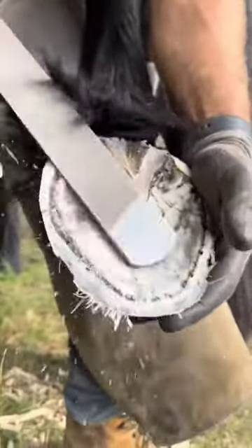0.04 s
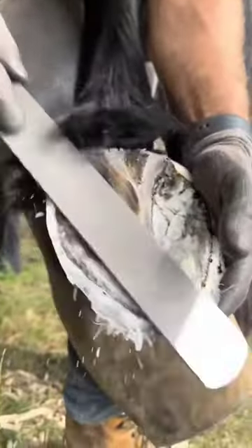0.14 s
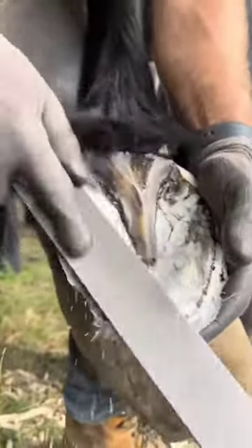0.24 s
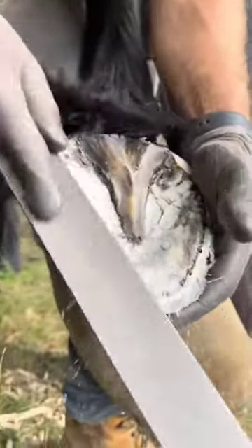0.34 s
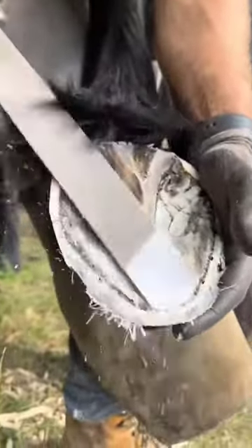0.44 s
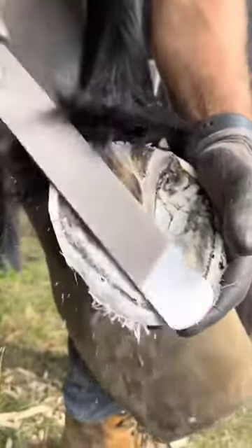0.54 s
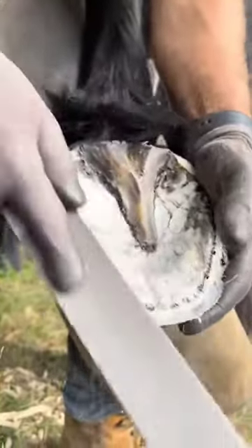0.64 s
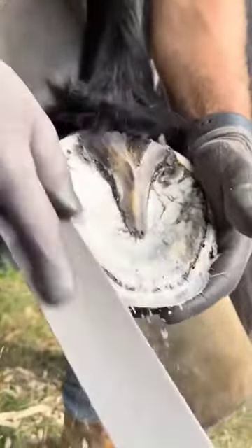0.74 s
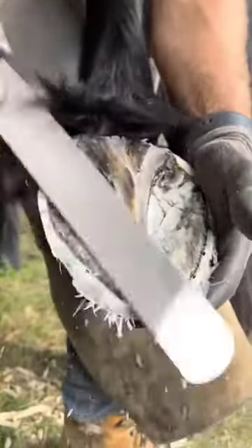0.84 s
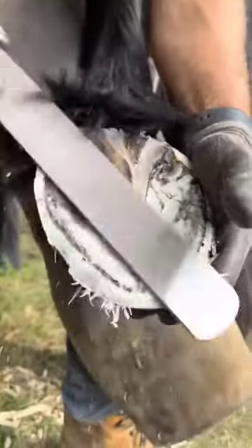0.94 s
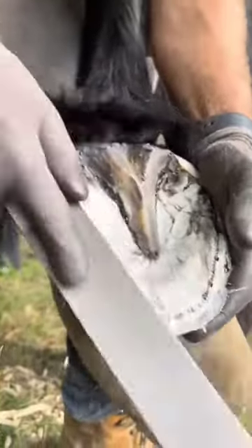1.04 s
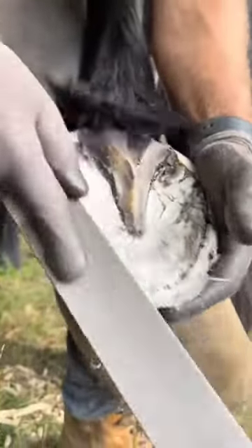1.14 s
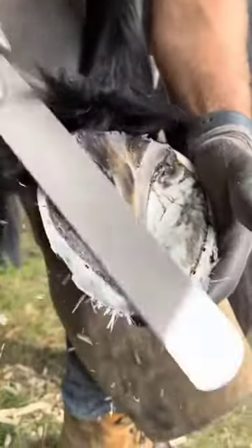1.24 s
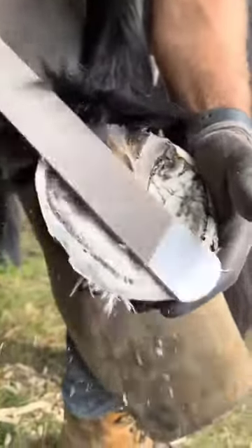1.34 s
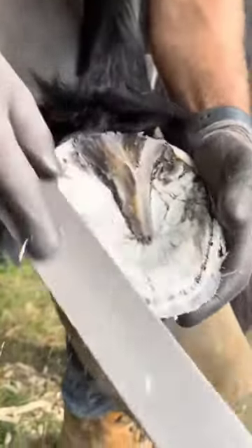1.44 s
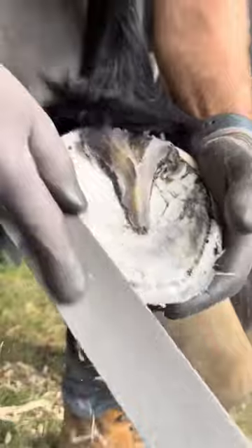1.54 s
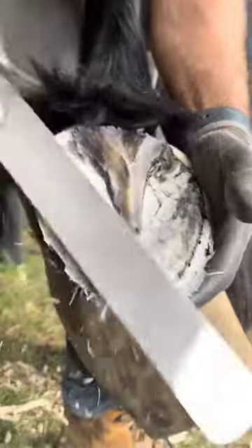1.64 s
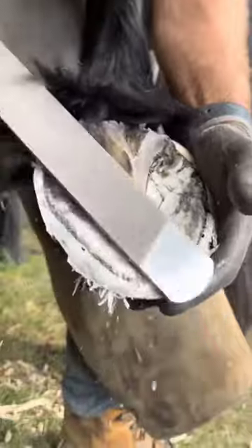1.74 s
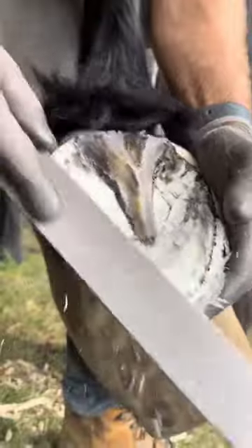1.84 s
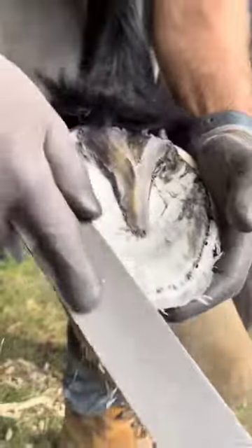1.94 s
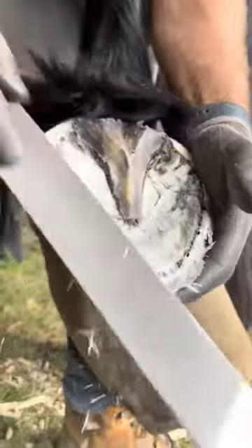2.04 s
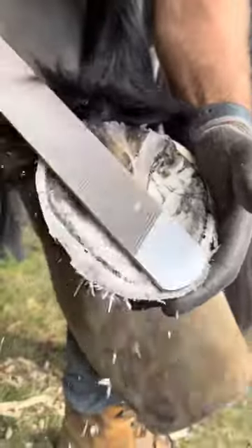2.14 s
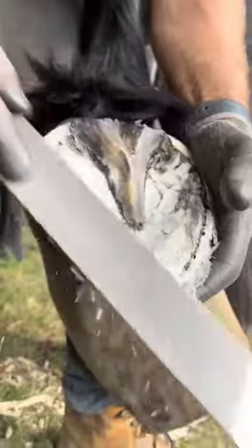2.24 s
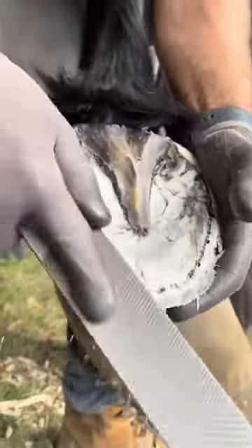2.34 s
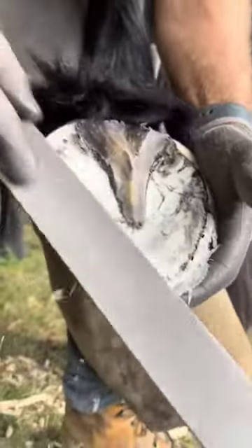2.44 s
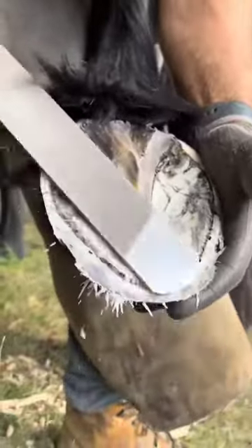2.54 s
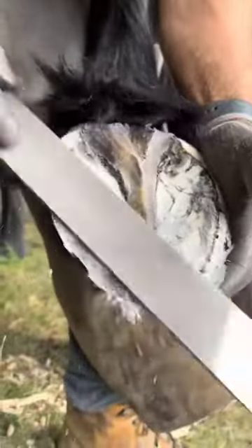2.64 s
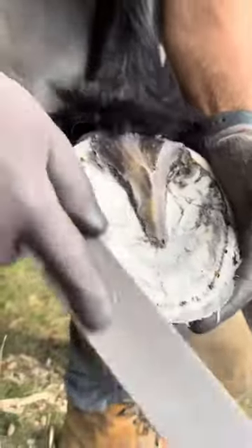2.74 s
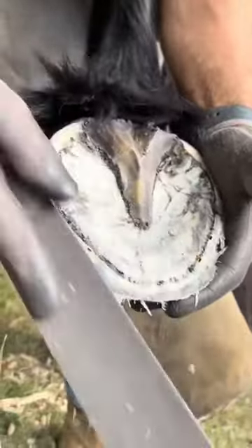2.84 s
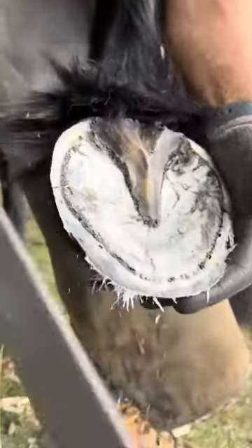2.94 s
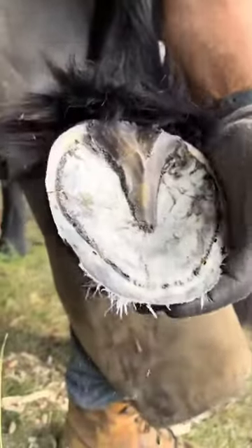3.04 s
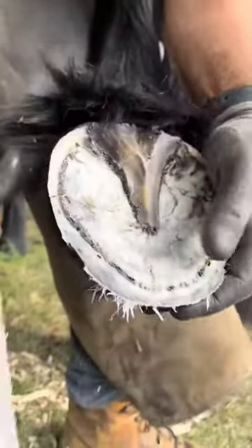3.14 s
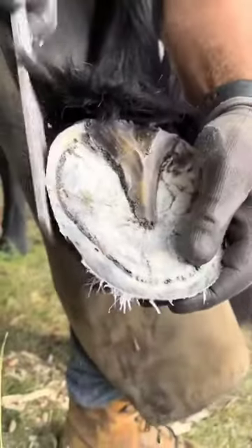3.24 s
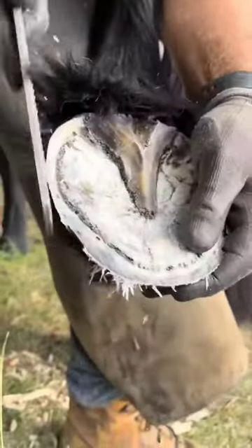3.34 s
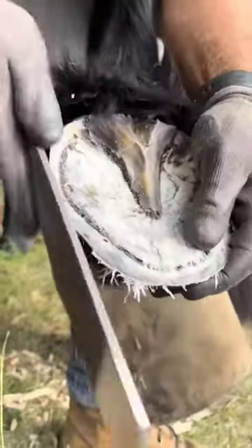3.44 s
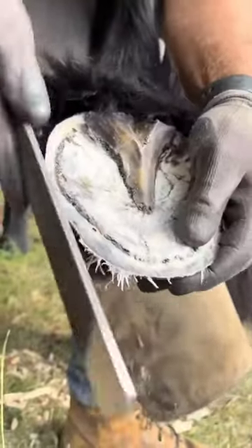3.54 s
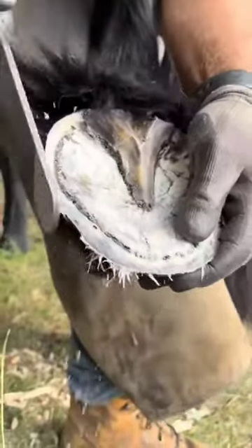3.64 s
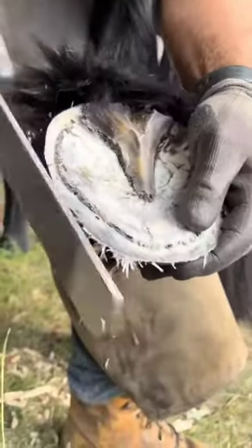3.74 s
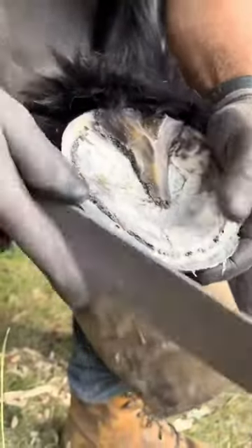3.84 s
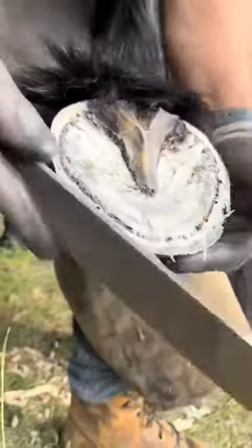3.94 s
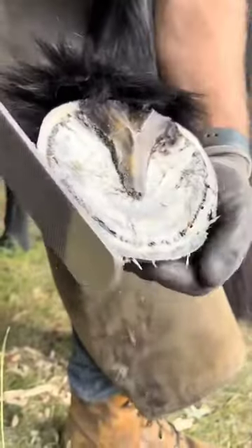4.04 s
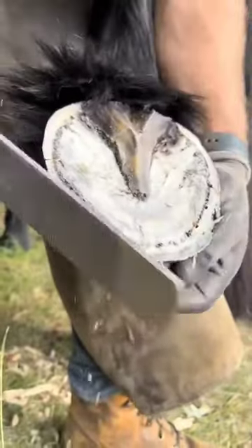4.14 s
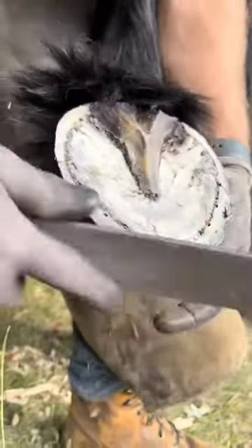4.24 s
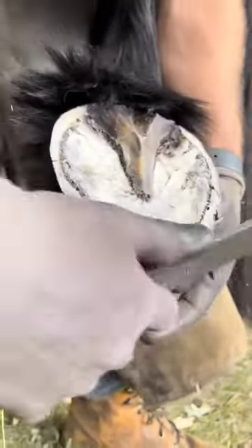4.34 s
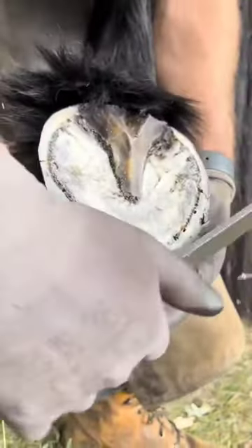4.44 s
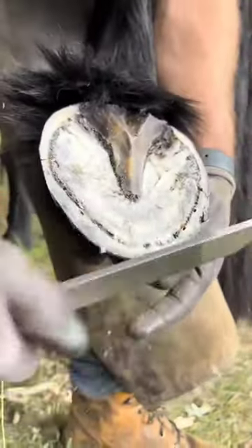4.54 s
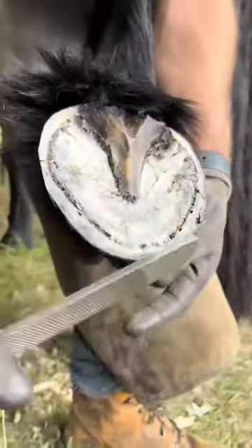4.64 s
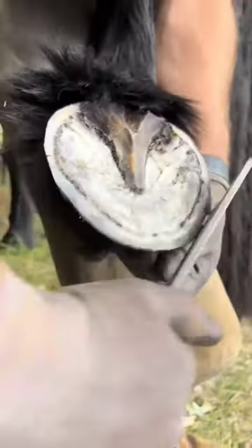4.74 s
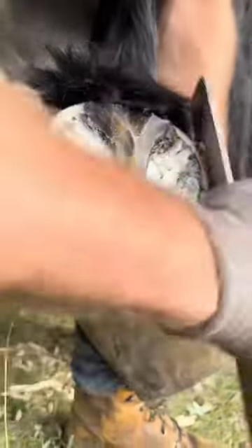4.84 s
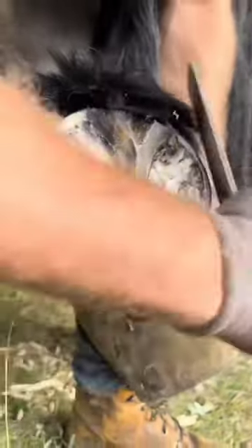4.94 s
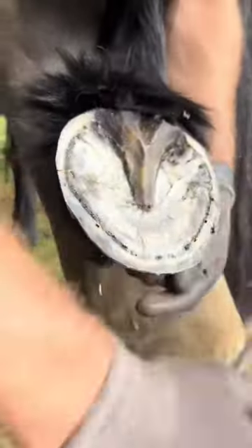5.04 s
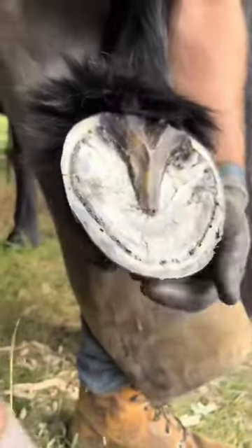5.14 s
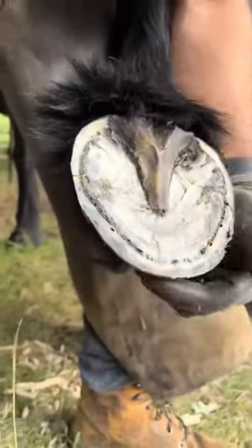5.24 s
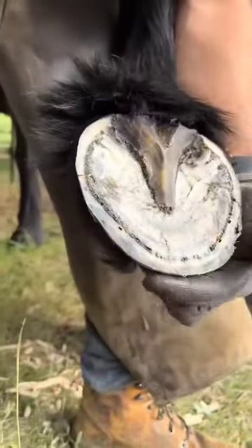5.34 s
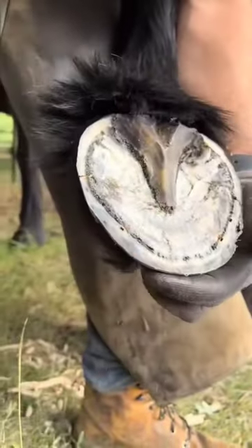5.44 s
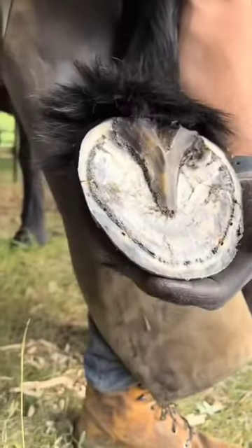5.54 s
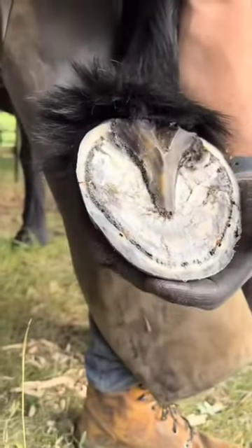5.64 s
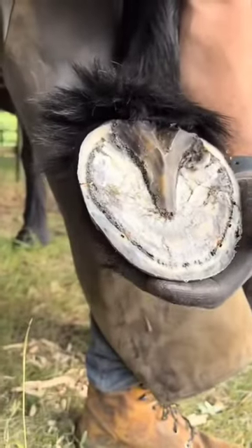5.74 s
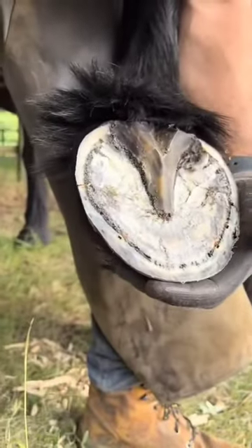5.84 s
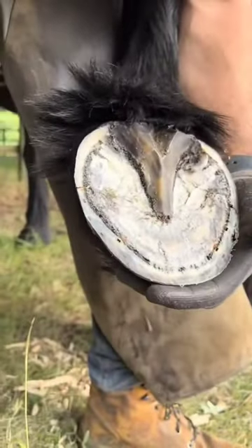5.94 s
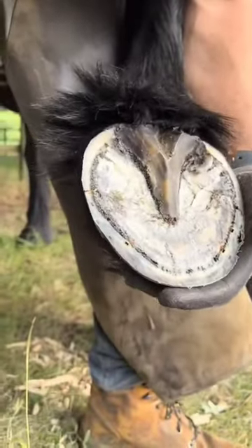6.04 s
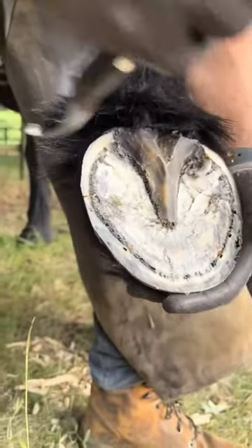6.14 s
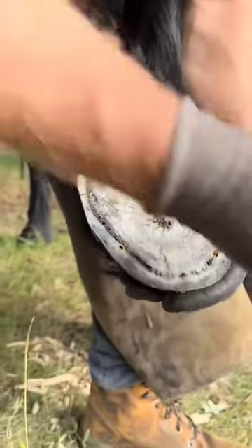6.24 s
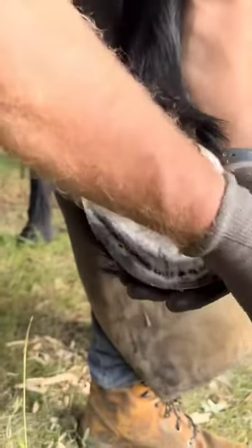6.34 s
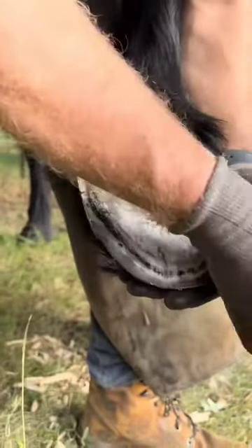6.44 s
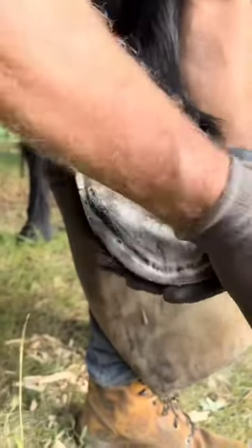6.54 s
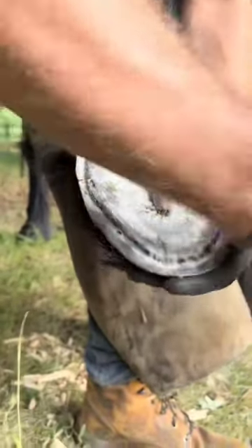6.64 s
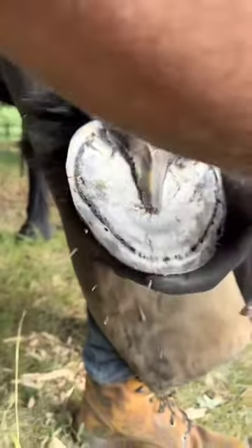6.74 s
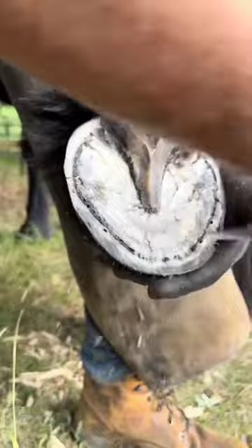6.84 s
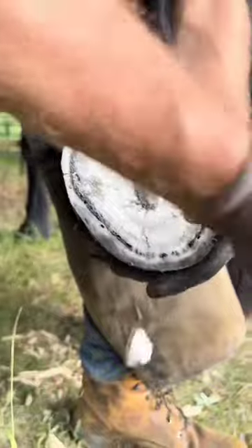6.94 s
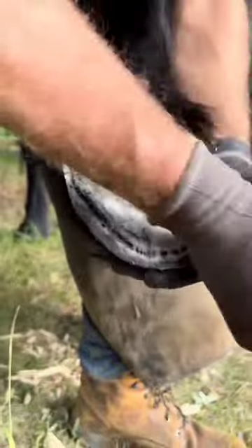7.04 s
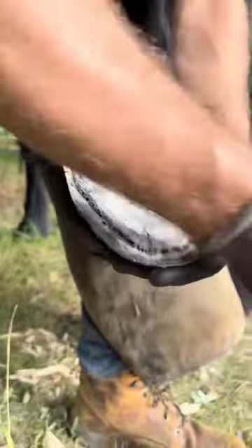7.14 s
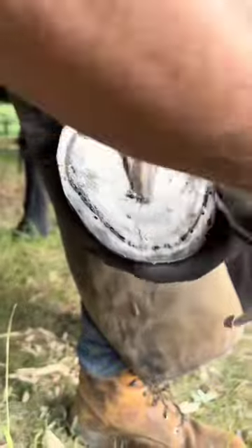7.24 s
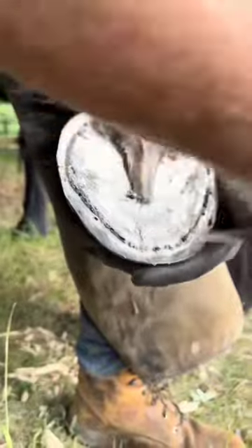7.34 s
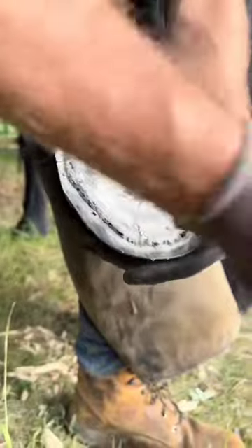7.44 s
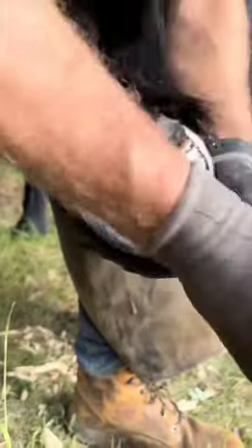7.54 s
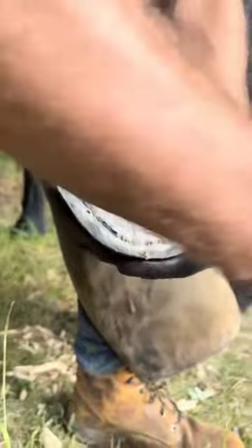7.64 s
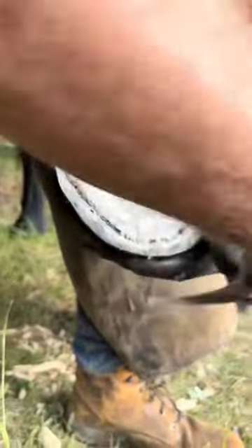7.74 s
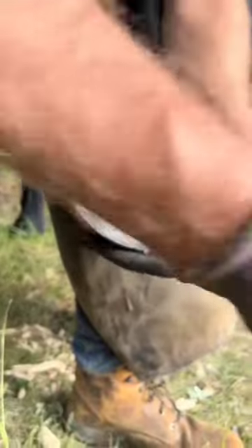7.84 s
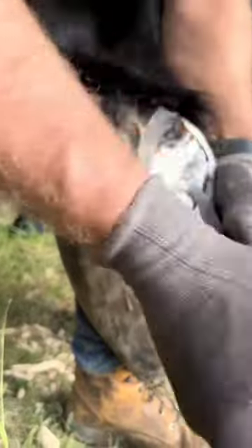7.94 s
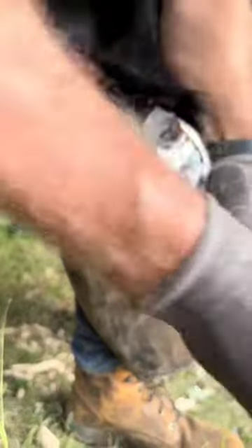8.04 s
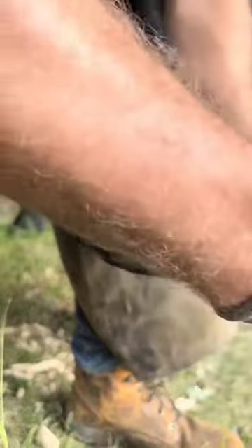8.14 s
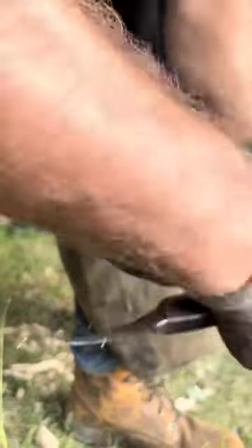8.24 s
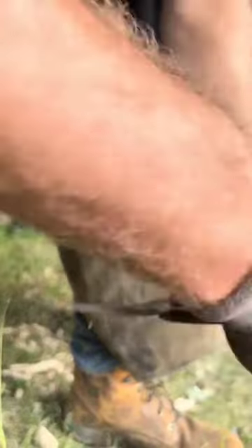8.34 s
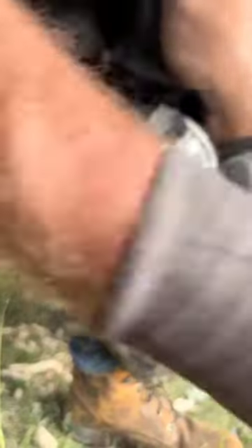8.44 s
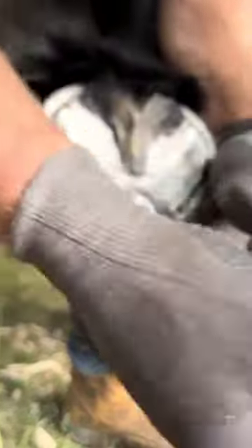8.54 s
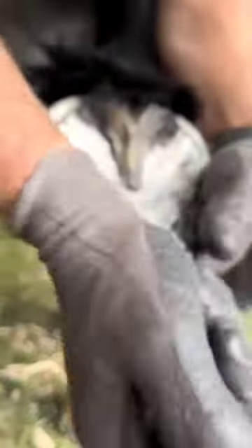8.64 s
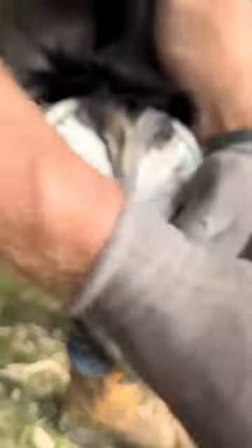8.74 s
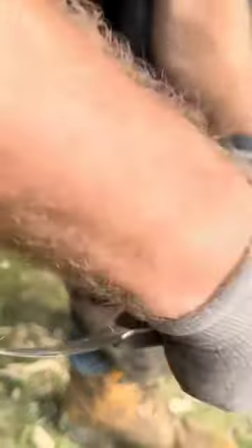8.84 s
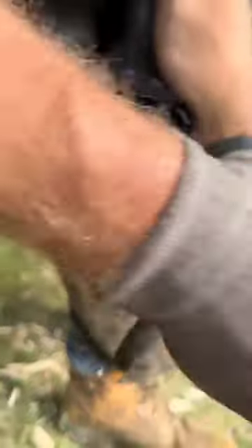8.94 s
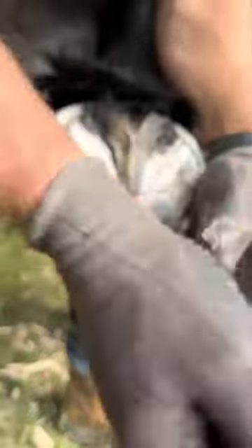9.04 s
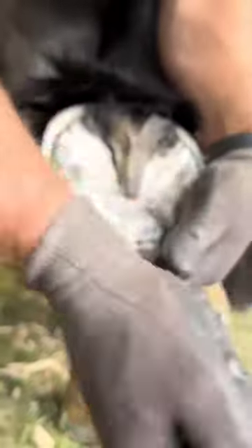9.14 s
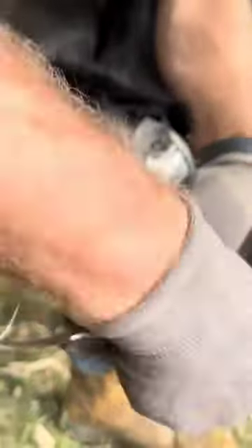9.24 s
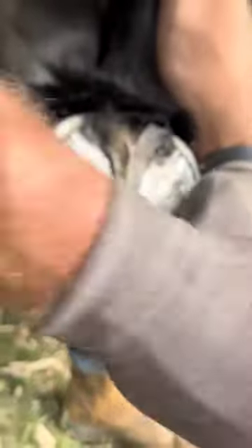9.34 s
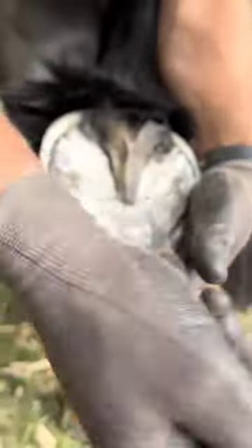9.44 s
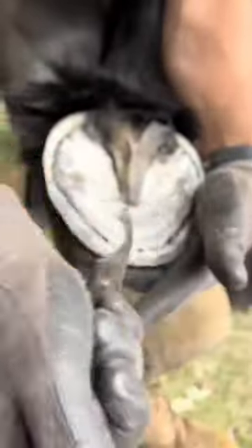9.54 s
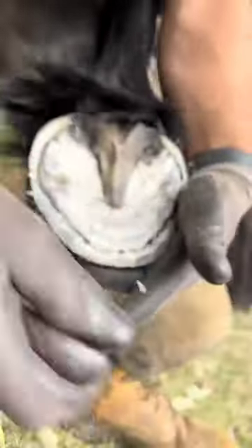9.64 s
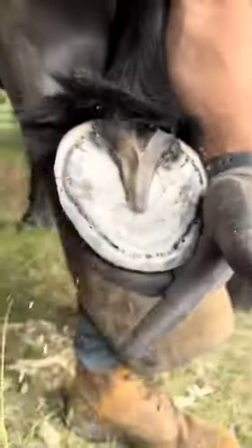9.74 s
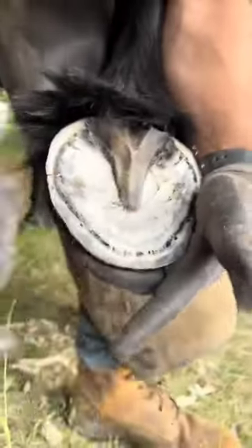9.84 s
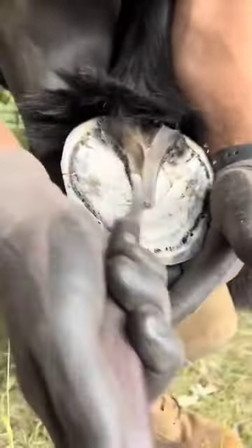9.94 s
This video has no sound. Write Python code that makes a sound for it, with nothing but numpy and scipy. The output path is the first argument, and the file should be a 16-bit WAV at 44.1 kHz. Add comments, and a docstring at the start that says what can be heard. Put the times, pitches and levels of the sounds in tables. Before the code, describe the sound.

Outdoors, coarse rhythmic filing of hoof horn gives way to lighter scrapes, a steel clack, then short knife scrapes and crisp snaps over a faint low drone.

```python
"""A farrier works on a horse's hoof outdoors, while a machine drones in the distance.
First the rasp goes to and fro across the sole: rows of teeth tear off clusters of fibres, in flat-topped arches.
Lighter strokes round the wall follow, with knocks and quick skips over the edge.
Then the steel rasp is slid away with a ringing scrape and a clack, its modes struck by the contact.
Last, a hoof knife drags in more pointed arches and pares off chips that snap free; cloth rustles at times."""
import sys
import numpy as np
from scipy import signal
from scipy.fft import rfft, irfft
from scipy.io import wavfile

SR = 44100
rng = np.random.default_rng(int(sys.argv[2]) if len(sys.argv) > 2 else 0)


def put_to_file(sound):
    """Save the sound as 16-bit audio at rate SR, in the file named by the first command-line argument."""
    columns = np.atleast_2d(sound).T  # one column per channel
    safe = np.clip(columns, -1, 1)
    whole_steps = np.round(safe * 32767)
    wavfile.write(sys.argv[1], SR, whole_steps.astype(np.int16))


N = 440559
TIME = np.arange(N) / SR


def amp(db):
    """Decibels to a linear factor."""
    return 10 ** (np.asarray(db) / 20)


def rms_one(x):
    """Scale to an rms of 1."""
    return x / np.sqrt(np.mean(x ** 2) + 1e-20)


def drift(rate):
    """Smooth random wander of rms 1, with `rate` turning points drawn per second."""
    knots = rng.standard_normal(int(rate * N / SR) + 2)
    return rms_one(np.interp(TIME * rate, np.arange(len(knots)), knots))


def band(x, low_hz, high_hz):
    """Gentle band-pass."""
    edges = [low_hz, min(high_hz, .45 * SR)]
    return signal.sosfilt(signal.butter(2, edges, "band", fs=SR, output="sos"), x)


def resonate(x, hz, width_hz):
    """One resonance: a two-pole ring, about unity gain at its peak."""
    radius = np.exp(-np.pi * width_hz / SR)
    zeros = np.array([1, 0, -1]) * (1 - radius * radius) / 2
    poles = [1, -2 * radius * np.cos(2 * np.pi * hz / SR), radius * radius]
    return signal.lfilter(zeros, poles, x + 1e-18)


def ringing(force, modes, spread_db):
    """Decaying modes, each struck with a strength of its own."""
    out = 0
    for hz, db, t60 in modes:
        strike = amp(db + spread_db * np.tanh(rng.standard_normal()))
        width_hz = np.log(1000) / np.pi / t60
        # narrow modes gather little, so they are scaled up
        out = out + strike * np.sqrt(t60 * SR) * resonate(force, hz, width_hz)
    return out


def colour(x, spectrum, size=16384):
    """Causal (minimum-phase) filter with the given gain per frequency, built by folding the cepstrum."""
    hz, db = np.transpose(spectrum)
    grid = np.log(np.maximum(np.arange(size // 2 + 1) * SR / size, 1))
    cepstrum = irfft(np.log(amp(np.interp(grid, np.log(hz), db))))
    cepstrum[1:size // 2] *= 2
    cepstrum[size // 2 + 1:] = 0
    impulse = irfft(np.exp(rfft(cepstrum)))
    return signal.fftconvolve(x, impulse[None], axes=-1)[:, :N]


def body(x, spectrum, low_hz):
    """Colour a force by a body that radiates little below low_hz, with the colour's own gain evened out."""
    hz, db = np.transpose(spectrum)
    grid = np.log(np.linspace(1, SR / 2, 4000))
    power = np.mean(amp(np.interp(grid, np.log(hz), db, right=-200)) ** 2)
    return band(colour(x, spectrum), low_hz, SR) / np.sqrt(power)


def brighten(x, db, corner_hz=4400):
    """Treble shelf made of a crossover whose halves add up flat."""
    low, high = (signal.butter(2, corner_hz, kind, fs=SR, output="sos") for kind in ("low", "high"))
    bass = signal.sosfilt(np.vstack([low, low]), x + 1e-18)
    treble = signal.sosfilt(np.vstack([high, high]), x + 1e-18)
    return bass + amp(db) * treble


def reflections(x, depth, lag_s, sway):
    """Three close reflections (hoof, hand, apron) comb the sound; their paths change as the tool moves."""
    out = x
    for k in range(3):
        read = TIME - lag_s * np.e ** k * (1 + sway * drift(7) / (k + 1))
        echo = np.array([np.interp(read, TIME, channel) for channel in x])
        out = out + depth * (-1) ** k * echo
    return out / np.sqrt(1 + 3 * depth ** 2)


def stereo(pair, width):
    """Two unrelated signals become middle and side."""
    side = colour(pair[1:], width)
    return pair[0] + side * [[1], [-1]]


def strokes(rows, edge_db, flatness, edge_hiss_db=0):
    """Gain and hiss (dB) of a row of strokes: arches edge_db down at their ends (flatness 1 pointed, 3 flat).

    The hiss changes by edge_hiss_db towards the ends, where the pressure is light."""
    power, hiss = np.full(N, 1e-18), np.zeros(N)
    for s, rise_s, fall_s, db, *hiss_db in rows:
        at = slice(*np.searchsorted(TIME, [s - rise_s, s + rise_s + 2 * fall_s]))
        past_top = TIME[at] - s - rise_s
        away = np.maximum(-past_top / rise_s, past_top / fall_s)   # 0 at the top, 1 at either end
        arch = amp(db - edge_db * away ** flatness) ** 2
        power[at] += arch
        hiss[at] += arch * (sum(hiss_db) + edge_hiss_db * away ** 2)
    return np.sqrt(power), hiss / power


def fractures(per_s, spread_db):
    """Tiny breaks of uneven size at random moments; two draws, rms 1."""
    sizes = amp(spread_db * np.minimum(rng.exponential(1, (2, N)), 4))
    signs = rng.choice([-1, 1], (2, N))
    return rms_one(sizes * signs * (rng.random((2, N)) < per_s / SR))


def burst(s, rise_s, fall_s, click, size=4096):
    """One contact: noise with a short rise, a click at its peak and a quick decay; returns place and force."""
    peak = round(s * SR)
    at = np.arange(max(peak - size // 2, 0), min(peak + size // 2, N))
    t = (at - peak) / SR
    force = rng.standard_normal((2, len(at))) * np.exp(np.minimum(t / rise_s, -t / fall_s))
    force[:, at == peak] = click
    return at, force


def blows(rows, rise_s, fall_s, click, lag_s):
    """Force of a table of contacts, each peaking lag_s after its listed time."""
    out = np.zeros((2, N))
    for s, db, *_ in rows:
        at, force = burst(s + lag_s, rise_s, fall_s, click)
        out[:, at] += amp(db) * force
    return out


# colour of the distant machine: (f/Hz, level/dB)
DRONE_COLOUR = [(20, -40), (35, -18.5), (50, -11), (66, 1), (90, -4), (130, -6.5), (147, -11), (176, -1),
                (213, -8.5), (242, -5.5), (315, -6), (360, -21.5), (480, -25.5), (750, -36.5), (3000, -43),
                (10000, -54)]
# stereo spread of the drone: (f/Hz, side minus mid/dB)
DRONE_SPREAD = [(60, -41.5), (170, -52), (460, -12), (1290, -2.5), (3580, -5.5), (9960, -6.5)]


def drone():
    """A distant machine: dull rumble of coloured noise with a few wavering tones of narrow-band noise."""
    rumble = amp(-40.0) * body(rng.standard_normal((2, N)), DRONE_COLOUR, low_hz=24)
    tones = 0
    for hz, db in [(66, -57), (175, -48.0), (242, -50.5)]:
        noise = rng.standard_normal((2, N))
        tones = tones + amp(db) * rms_one(resonate(resonate(noise, hz, 14), hz, 14))
    return stereo(rumble + tones, DRONE_SPREAD)


# glove and apron rubs: (start t/s, rise t/s, fall t/s, level/dB)
CLOTH_RUBS = [(2.66, 0.057, 0.064, -54.5), (2.775, 0.052, 0.033, -47), (4.93, 0.1, 0.12, -55),
              (5.39, 0.12, .13, -51), (5.62, .29, .14, -56), (6.27, 0.08, 0.07, -60.5),
              (7.93, 0.021, 0.11, -52), (8.12, .14, 0.13, -55.5), (8.35, 0.046, .045, -51),
              (9.53, 0.068, 0.11, -60.5)]
# colour of cloth and leather: (f/Hz, level/dB)
CLOTH_COLOUR = [(400, 0), (900, -3.5), (3300, -4.5), (5000, -9), (6400, -5.5), (9500, -14)]
# stereo spread of everything near the hoof, shared below: (f/Hz, side minus mid/dB)
HOOF_SPREAD = [(60, -33), (170, -51), (460, -12), (1290, -24.5), (3580, -12.5), (9960, -9.5)]


def rustle():
    """Glove and leather apron rub softly, in uneven creases: tiny fractures under slow arches."""
    gain, _ = strokes(CLOTH_RUBS, edge_db=16.5, flatness=1.1)
    rub = body(fractures(4000, 2.5), CLOTH_COLOUR, low_hz=450)
    rub = reflections(rub, depth=.35, lag_s=0.00049, sway=0.72)
    return stereo(amp(-0.5 + 1.1 * drift(36)) * gain * rub, HOOF_SPREAD)


# the arm jolts as the blade comes free: (t/s, level/dB)
ARM_JOLTS = [(6.464, -26), (7.468, -26.5), (8.006, -23), (8.59, -32), (9.001, -28), (9.441, -28)]


def jolts(hz=52, swell_s=0.0064):
    """A few slow swings of air pressure after a cut, swelling and dying fast."""
    swings = 0
    for s, db in ARM_JOLTS:
        age = np.clip((TIME - s) / swell_s, 0, 20)   # in swell times
        swings = swings + amp(db) * np.sin(2 * np.pi * hz * swell_s * age) * age * np.exp(1 - age)
    return band(swings, 35, 400)


# dull thuds of foot and apron under the work: (t/s, level/dB, relative boom level/dB)
FOOT_THUDS = [(0.003, -19, -1.5), (0.252, -34, -24), (0.387, -29, 0), (0.784, -36, 0), (1.073, -37, -7),
              (1.186, -36, -16), (1.601, -35.5, -4.5), (2.019, -35, -4.5), (2.445, -33.5, 3),
              (3.061, -32, -6), (4.396, -37.5, -20), (5.529, -41, 2), (9.95, -40, -21.5)]
# colour of a thud: (f/Hz, level/dB)
THUD_COLOUR = [(300, -10), (400, 2), (500, 5), (620, -4.5), (760, -1), (1000, -7), (1300, -7),
               (2500, -44.5)]


def thuds():
    """A deep bite or a shove knocks the hoof and makes the whole foot boom."""
    s, _, boom_db = np.transpose(FOOT_THUDS)
    force = blows(FOOT_THUDS, rise_s=0.003, fall_s=0.015, click=0, lag_s=0.0015)
    foot = [(150, -18.5), (200, 5), (262, 1.0), (340, -5.5), (600, -38.5)]   # (f/Hz, level/dB)
    boom = amp(np.interp(TIME, s, boom_db) + 7.0) * body(force, foot, low_hz=150)
    return stereo(body(force, THUD_COLOUR, low_hz=280) + boom, HOOF_SPREAD)


# the knife is set on the hoof: (t/s, level/dB)
KNIFE_TOUCHES = [(6.827, -43.5), (7.09, -46.5), (7.288, -30), (7.719, -17), (8.885, -26), (9.141, -40.5),
                 (9.788, -30), (9.795, -7.5), (9.834, -32)]
# colour of a tap: (f/Hz, level/dB)
TAP_COLOUR = [(400, -11.5), (800, -12.5), (1300, 3.5), (1800, -4), (2600, 7), (3600, -8), (4600, -24.5),
              (10000, -40)]
# ringing of the knife, used by taps and cuts: (f/Hz, level/dB, 60 dB decay t/s)
KNIFE_RING = [(1420, 2, 0.065), (1784, -5, 0.035), (2300, -5.5, 0.094), (2870, -8, 0.027),
              (3576, 1.5, 0.036), (4200, -13, 0.03)]


def knife_taps(dulling=0.39):
    """Dull, short clicks of the blade meeting the hoof; the softer the touch, the duller."""
    s, db = np.transpose(KNIFE_TOUCHES)
    force = blows(KNIFE_TOUCHES, rise_s=0.00029, fall_s=0.0038, click=3.1, lag_s=0.00076)
    force = brighten(force, dulling * np.interp(TIME, s, db - db.max()), corner_hz=1700)
    touch = amp(-5) * body(force, TAP_COLOUR, low_hz=500)
    ring = amp(-36.0) * ringing(force, KNIFE_RING, spread_db=8)
    return stereo(touch + ring, HOOF_SPREAD)


# the knife dragging through horn: (start t/s, rise t/s, fall t/s, level/dB, relative hiss level/dB)
PARING_STROKES = [(6.44, 0.014, 0.054, -31.5, -3), (6.915, 0.087, 0.044, -39.5, -1.5),
                  (7.35, 0.05, .11, -45.5, -6), (7.39, 0.079, 0.038, -37, -4.5),
                  (7.765, 0.07, 0.11, -48, -7), (8.39, 0.2, 0.04, -40, -7.5), (8.94, 0.049, 0.083, -37, -3),
                  (9.315, 0.13, 0.031, -52.5, -2), (9.842, 0.11, .013, -31, -8.5)]
# chips break free: (t/s, level/dB, relative brightness level/dB, pitch f/Hz, relative blade ring level/dB)
CHIP_SNAPS = [(6.457, -20, -8, 4150, -39), (6.48, -21.5, -23, 1046, -36), (6.945, -36, -15, 2500, -45),
              (6.975, -20.5, -16.5, 4260, -38), (7.004, -28.5, -14.5, 3110, -32),
              (7.445, -33.5, -13, 2500, -45), (7.47, -22.5, -16, 3950, -39), (7.806, -39, -23, 2500, -45),
              (7.868, -39, -14.5, 2500, -47), (8.002, -16.5, -15.5, 1750, -28.5),
              (8.485, -35, -18, 2500, -44), (8.525, -18.5, -24, 2330, -36.5), (8.555, -31, -21, 2500, -46),
              (8.584, -10.5, -22.5, 2560, -52), (8.97, -21, -22.5, 2420, -27), (8.993, -19, -20, 2000, -40),
              (9.023, -10, -26.5, 2540, -26.5), (9.353, -28, -14.5, 2300, -27),
              (9.391, -20.5, -21.5, 2490, -40), (9.408, -21, -16, 2750, -45),
              (9.434, -12, -16.5, 1950, -53), (9.95, -7, -19, 2400, -46)]
# colour of cut horn: (f/Hz, level/dB)
HORN_COLOUR = [(240, -33), (400, -5.5), (641, -12), (1620, -2.5), (2180, -7), (2500, -4), (4340, -10),
               (5030, -14.5), (6950, -13.5), (10000, -25), (13000, -49), (22000, -120)]


def knife_cuts(size=8192):
    """The blade drags through horn until a chip snaps off at a pitch set by its size, and the freed blade rings."""
    gain, hiss_db = strokes(PARING_STROKES, edge_db=25, flatness=1.74, edge_hiss_db=-4.0)
    crunch = rms_one(fractures(3500, 3.3) * amp(3.8 * drift(220)))
    drag = amp(-3.0) * brighten(gain * crunch, hiss_db + 7.5)
    snaps, rings = np.zeros((2, 2, N + size))
    for s, db, bright_db, hz, ring_db in CHIP_SNAPS:
        at, force = burst(s + 0.00154, rise_s=0.0032, fall_s=0.003, click=2.6)
        force = amp(db) * np.pad(force, [(0, 0), (0, size - len(at))])   # room to ring out
        span = slice(at[0], at[0] + size)
        snaps[:, span] += brighten(force + 1.73 * resonate(force, hz, 450), bright_db + 19.5)
        rings[:, span] += amp(ring_db) * ringing(force, KNIFE_RING, spread_db=3)
    sound = body(drag + amp(-9.0) * snaps[:, :N], HORN_COLOUR, low_hz=404) + rings[:, :N]
    return stereo(reflections(sound, depth=0.2, lag_s=.0004, sway=0.23), HOOF_SPREAD)


# the rasp sliding on metal: (start t/s, rise t/s, fall t/s, level/dB, relative hiss level/dB)
STEEL_SLIDE = [(5.178, .017, .025, -17.5, -3), (5.19, 0.024, 0.11, -19, 6), (5.325, 0.046, 0.078, -30, 2.5),
               (5.47, 0.08, 0.063, -48, 0.5)]
# steel on steel: (t/s, level/dB, relative brightness level/dB)
STEEL_CLACKS = [(5.193, -1, -13.5), (5.218, -14.5, 1), (5.332, -17.5, -10), (5.36, -8, 2),
                (5.407, -22, -11.5)]
# colour of the steel contact: (f/Hz, level/dB)
STEEL_COLOUR = [(210, -58), (350, -12), (696, -10), (835, -16), (1460, -9.5), (2600, -1), (2870, -7.5),
                (4690, -8.5), (5710, -7.5), (8330, -3), (10000, -22), (13000, -36), (22000, -120)]
# ringing of the rasp: (f/Hz, level/dB, 60 dB decay t/s)
RASP_RING = [(1927, -6, .08), (2150, -7, .07), (2562, -5, .11), (3106, -7, .1), (3796, -4, .13),
             (4160, -8, .12), (5326, 0, .18), (5485, -3, .14), (5800, 1, .13), (6376, -2, .11),
             (7074, -4, .16), (7193, -4, .13), (7537, -7, .12), (8211, -7, .1), (8923, -8, .11)]
# stereo spread of the steel: (f/Hz, side minus mid/dB)
STEEL_SPREAD = [(60, -3.5), (220, -13), (770, -3.5), (2770, -9), (9960, -8.5)]


def rasp_put_away():
    """Steel sings as it slides on steel, then clacks home, where the contact damps it."""
    gain, hiss_db = strokes(STEEL_SLIDE, edge_db=24, flatness=1.2)
    slide = amp(2.3 * drift(250)) * gain * fractures(6000, 3.7)
    slide = amp(0.5) * brighten(slide, hiss_db)
    s, _, bright_db = np.transpose(STEEL_CLACKS)
    clacks = blows(STEEL_CLACKS, rise_s=0.0012, fall_s=0.0036, click=1.5, lag_s=.0015)
    clacks = brighten(clacks, np.interp(TIME, s, bright_db) + 2.5)
    # the rattling contact roughens the ring and chokes it, by 170 dB/s, once the rasp is seated
    choke = amp(2.5 * drift(160) - 170 * np.maximum(TIME - 5.33, 0))
    ring = choke * ringing(slide + amp(-4) * clacks, RASP_RING, spread_db=2)
    contact = body(slide + amp(-3.5) * clacks, STEEL_COLOUR, low_hz=300.7)
    sound = amp(-1.0) * contact + amp(-20.0) * ring
    return stereo(reflections(sound, depth=0.12, lag_s=.0009, sway=0.061), STEEL_SPREAD)


# the rasp knocks or catches on the hoof: (t/s, level/dB)
RASP_KNOCKS = [(0.33, -24), (0.755, -28), (1.176, -14), (1.374, -34), (1.411, -22.5), (1.586, -15.5),
               (2.004, -19), (2.201, -27), (2.255, -14), (3.059, -19.5), (3.087, -41), (3.159, -26),
               (4.55, -32), (4.586, -20.5), (4.609, -17), (4.718, -37)]
# the rasp skips over the edge of the wall: (from t/s, to t/s, skip rate f/Hz, level/dB)
EDGE_SKIPS = [(3.763, 3.841, 70, -21.5), (4.292, 4.397, 61, -29), (4.5, 4.526, 82, -28)]
# colour of the hoof wall, used by catches and wall strokes: (f/Hz, level/dB)
WALL_COLOUR = [(240, -21), (400, -21), (464, 3), (553, -5.5), (885, -5), (1270, -3.5), (1810, -1),
               (2400, 0), (5030, -11.5), (5530, -7.5), (6860, -13.5), (8980, -12), (10000, -27),
               (13000, -73), (22000, -120)]


def rasp_catches():
    """The rasp lands or snags at the turn of a stroke, and skips in quick uneven runs over the edge."""
    skips = []
    for start, end, per_s, db in EDGE_SKIPS:
        for s in np.arange(start, end, 1 / per_s):
            skips.append((s + rng.normal(0, 0.0011), db + rng.normal(0, 1.6)))
    force = blows(RASP_KNOCKS, rise_s=0.0011, fall_s=0.006, click=2, lag_s=0.002)
    force += blows(skips, rise_s=0.00027, fall_s=0.0014, click=2.2, lag_s=0)
    sound = reflections(body(force, WALL_COLOUR, low_hz=300), depth=0.16, lag_s=0.00079, sway=0.14)
    return stereo(amp(-9.0) * sound, HOOF_SPREAD)


def bouncing(lift_db=11):
    """While the rasp skips it leaves the horn between landings, and the scrape is chopped at that rate."""
    off = 0
    for start, end, per_s, _ in EDGE_SKIPS:
        skipping = (start < TIME) & (TIME < end)
        off = off + skipping * np.sin(np.pi * per_s * (TIME - start)) ** 2
    return amp(-lift_db * off)


def teeth(gain, rows_hz, speed_power, chatter_db, per_s, spread_db):
    """Rows of teeth bite in turn, faster in a strong stroke; each row tears off a cluster of fibres."""
    speed = (gain / gain.max()) ** speed_power * amp(1.543 * drift(40))
    rows = np.sin(2 * np.pi * np.cumsum(rows_hz * speed) / SR)
    return rms_one(fractures(per_s, spread_db) * amp(chatter_db * (rows + 1.06 * drift(200))))


# arch of a rasp stroke: how far down its ends lie, and how flat its top is
RASP_EDGE_DB, RASP_FLATNESS = 28, 2.8
# lighter strokes round the wall: (start t/s, rise t/s, fall t/s, level/dB, relative hiss level/dB)
WALL_PASSES = [(3.155, .063, .083, -30, 3), (3.325, .072, .088, -34.5, -1.5),
               (3.512, .043, .146, -32.5, -2.5), (3.71, .093, .1, -36, 1), (3.874, .116, .234, -41, -0.5),
               (4.237, .14, 0.0499, -40, 0), (4.48, .042, .25, -41, -0.5)]


def rasp_wall():
    """Light, slow strokes on the edge: few teeth touch, and single rows tick."""
    gain, hiss_db = strokes(WALL_PASSES, RASP_EDGE_DB, RASP_FLATNESS)
    force = teeth(gain, rows_hz=246.0, speed_power=.9, chatter_db=2.0, per_s=6500, spread_db=2.5)
    scrape = amp(0.14) * body(force, WALL_COLOUR, low_hz=330)
    scrape = reflections(scrape, depth=0.32, lag_s=.0007, sway=0.12)
    return stereo(gain * bouncing() * brighten(scrape, hiss_db), HOOF_SPREAD)


def rasp_squeak(hz=2030, db=-29):
    """The teeth stick and slip for an instant on a back stroke: a brief sine of unsteady pitch."""
    swell = np.exp(-((TIME - .598) / .011) ** 2)
    pitch = hz * (1 + 0.011 * drift(205.3))
    return amp(db) * swell * np.sin(2 * np.pi * np.cumsum(pitch) / SR)


# resonances of the hoof and the hand-damped rasp: (f/Hz, width f/Hz, level/dB)
HOOF_RESONANCES = [(1350, 180, 0), (2560, 170, 0), (2710, 200, -2), (4820, 150, -3.5), (6250, 160, -18),
                   (6870, 170, -19)]


def hoof_ring(force, wander_db):
    """Hoof and blade resonances swell and fade as the contact point travels."""
    out = 0
    for k, (hz, width_hz, db) in enumerate(HOOF_RESONANCES):
        level = amp(db + wander_db * np.tanh(drift(16)))
        out = out + (-1) ** k * level * rms_one(resonate(force, hz, width_hz))
    return rms_one(out)


# strokes across the sole, push and pull in turn:
# (start t/s, rise t/s, fall t/s, level/dB, relative hiss level/dB)
SOLE_PASSES = [(-0.032, 0.04, 0.1, -23.5, -7.5), (0.13, 0.064, 0.12, -27.5, -6.5),
               (0.351, 0.052, 0.112, -23.5, -4), (0.544, 0.092, 0.075, -27.5, -6.0),
               (0.746, 0.057, 0.12, -25.0, -4), (0.951, 0.088, 0.068, -31, -4),
               (1.158, 0.05, 0.14, -27, -3), (1.406, 0.023, 0.095, -26.5, -8),
               (1.56, 0.083, 0.13, -25.5, -4), (1.785, 0.09, 0.079, -31, -4.5),
               (1.984, 0.073, 0.11, -27, -1.5), (2.24, 0.017, 0.1, -25.5, -7),
               (2.394, 0.076, 0.14, -24.5, -5.5)]
# colour of the sole: (f/Hz, level/dB)
SOLE_COLOUR = [(240, -24), (400, -41.5), (477, -48), (795, -3.5), (947, -7.5), (1360, -1), (1860, -4),
               (2670, 4.5), (3840, -7), (4700, -6.5), (5030, -7), (5530, -2), (7740, -6.5), (9220, -9),
               (10000, -21.5), (13000, -9.5), (22000, -120)]


def rasp_sole():
    """Hard strokes across the flat of the foot: biting teeth excite the sole and its resonances."""
    gain, hiss_db = strokes(SOLE_PASSES, RASP_EDGE_DB, RASP_FLATNESS, edge_hiss_db=2)
    force = teeth(gain, rows_hz=431.0, speed_power=.2, chatter_db=1.5, per_s=12000, spread_db=2.5)
    scrape = amp(0.5) * body(force, SOLE_COLOUR, low_hz=425)
    scrape = scrape + amp(-11.0) * hoof_ring(force, wander_db=15.5)
    scrape = scrape + amp(-18.0) * rms_one(resonate(force, 647, 220))   # the hollow hoof capsule
    scrape = reflections(scrape, depth=0.22, lag_s=.0006, sway=0.311)
    return stereo(gain * brighten(scrape, hiss_db + 2.5), HOOF_SPREAD)


def scene():
    """Drone and handling noises under the knife, a little to the left, and the rasp."""
    background = drone() + rustle() + jolts() + thuds()
    knife = (knife_cuts() + knife_taps()) * amp([[.4], [-.4]])
    rasp = rasp_put_away() + rasp_catches() + rasp_wall() + rasp_squeak() + rasp_sole()
    return background + knife + rasp


def record(dry):
    """The highest peaks are rounded and the top is cut steeply above 9800 Hz."""
    rounded = .75 * np.tanh(dry / .75)
    return signal.sosfilt(signal.ellip(10, .2, 80, 9800, fs=SR, output="sos"), rounded)


dry = scene()
out = record(dry)
put_to_file(out)
```